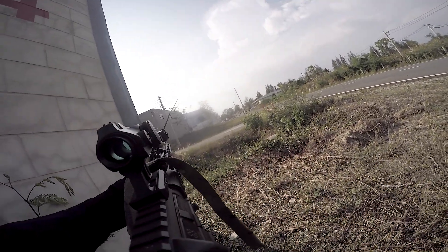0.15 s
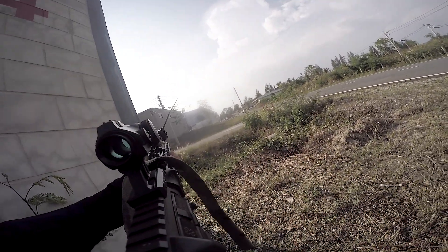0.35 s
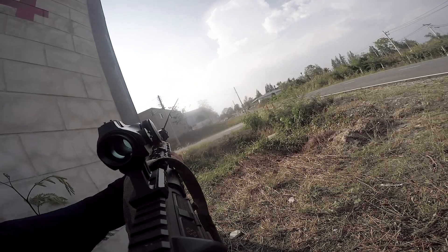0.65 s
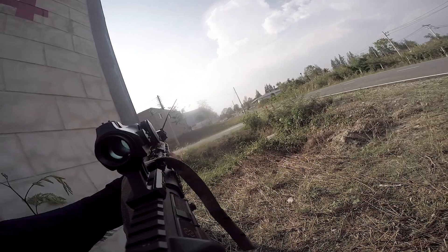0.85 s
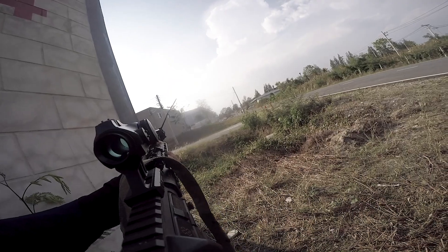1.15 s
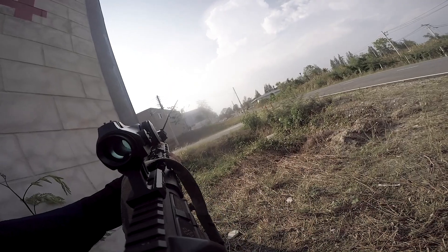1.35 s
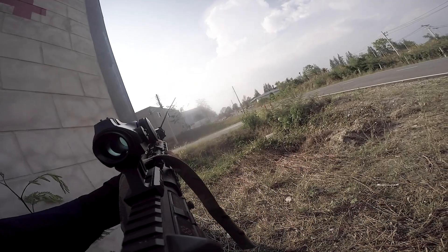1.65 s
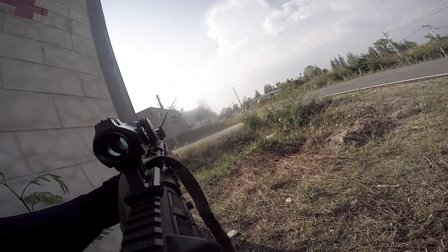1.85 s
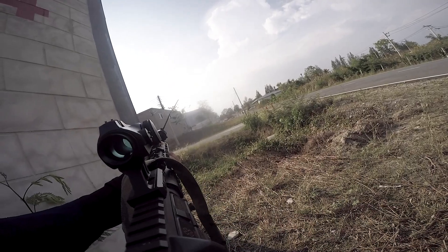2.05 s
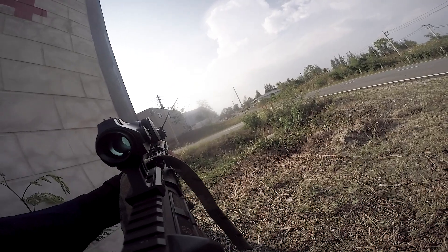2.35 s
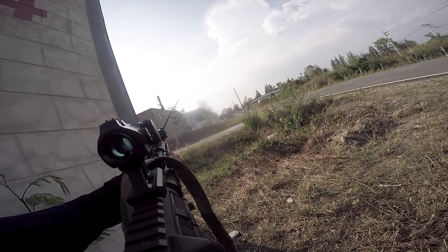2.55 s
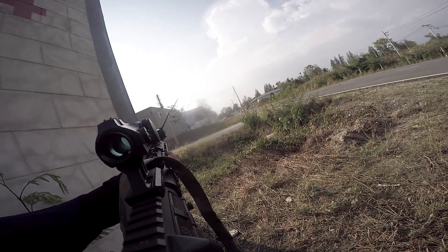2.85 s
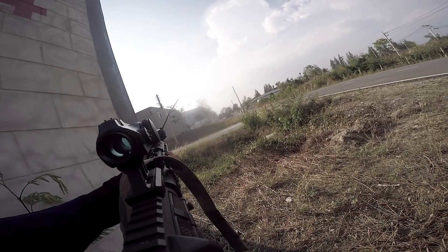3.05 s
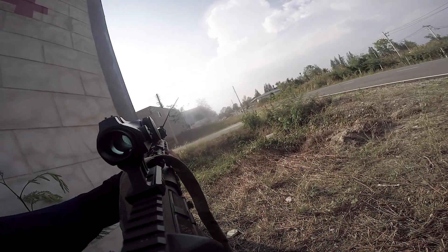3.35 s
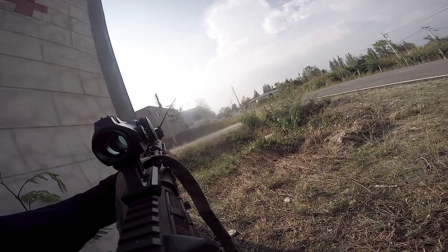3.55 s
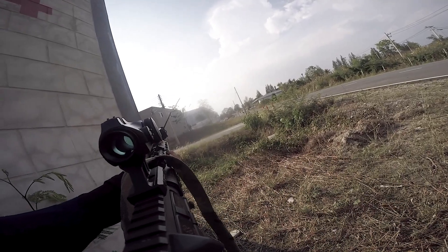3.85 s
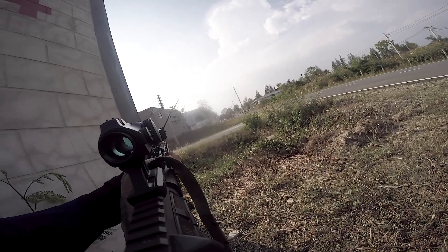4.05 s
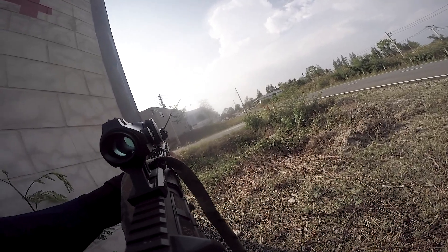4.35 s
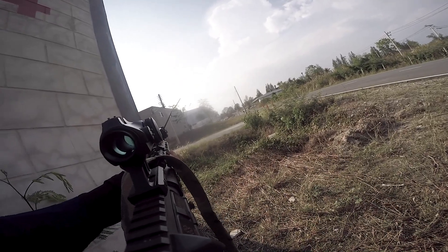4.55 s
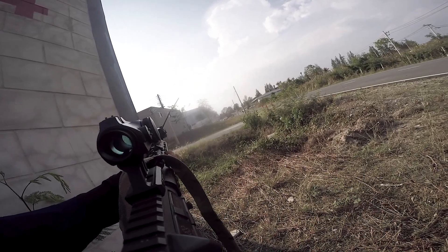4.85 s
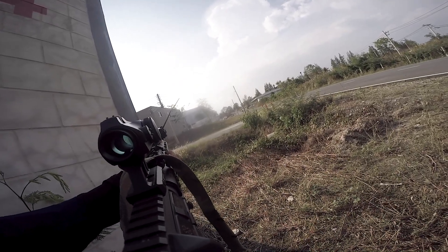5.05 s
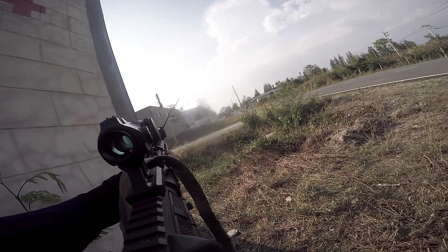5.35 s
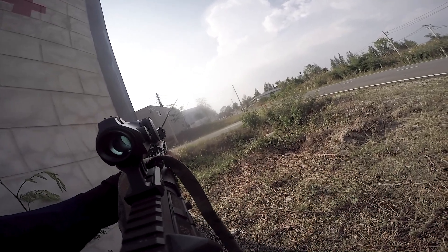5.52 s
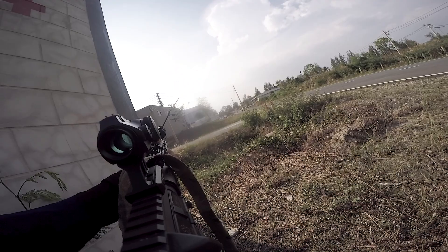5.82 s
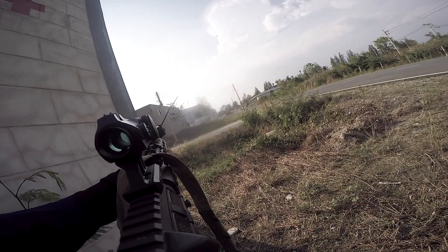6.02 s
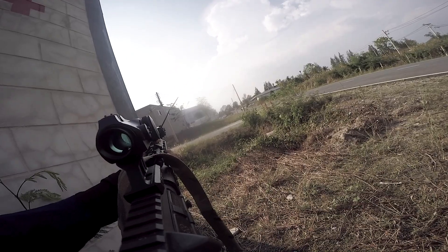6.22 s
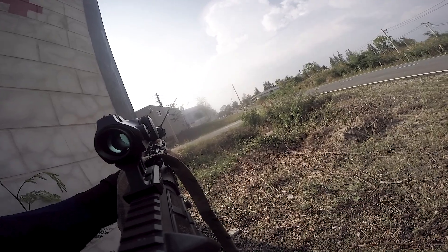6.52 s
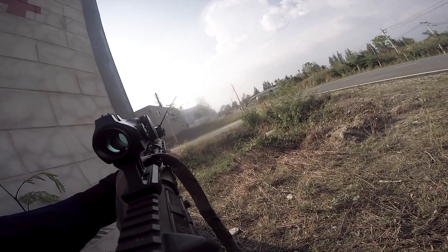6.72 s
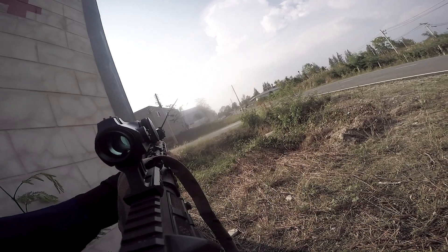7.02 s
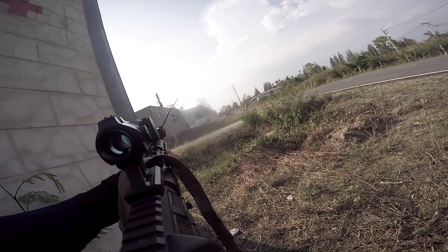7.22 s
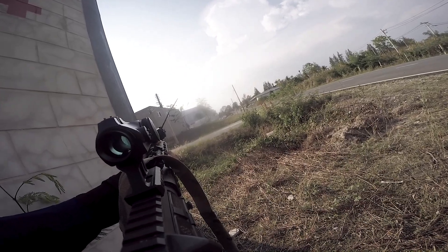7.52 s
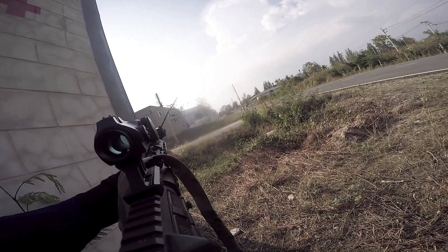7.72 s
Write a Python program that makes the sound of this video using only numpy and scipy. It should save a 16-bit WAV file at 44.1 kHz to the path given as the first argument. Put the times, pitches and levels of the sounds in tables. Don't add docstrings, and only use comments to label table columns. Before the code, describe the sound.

Outdoors beside a block wall, an electric airsoft rifle fires single shots about five a second, very close to a head-worn microphone. Each is a tiny motor whir, gear grind and a double clack ending in a hard piston slam. Strings break into short pauses holding faint trigger ticks and a sling rustle. Soft wind buffets underneath, with only a slight echo off the wall.

```python
import sys
import numpy as np
from scipy import signal
from scipy.fft import rfft, irfft, next_fast_len
from scipy.io import wavfile
from scipy.ndimage import uniform_filter1d, map_coordinates

SR = 44100
rng = np.random.default_rng(int(sys.argv[2]) if len(sys.argv) > 2 else 0)


def master_out(mix):
    frames = np.transpose(np.atleast_2d(mix))
    ceiling = np.clip(frames, -1, 1)
    pcm = np.round(ceiling * 32767).astype(np.int16)
    wavfile.write(sys.argv[1], SR, pcm)


def voltage_ratio(decibels):
    exponent = np.asarray(decibels, float) / 20
    return 10 ** exponent


N = 347508
BEFORE, SPAN, BUSY = 2400, 15000, 6000


def filtered(x, response):
    m = next_fast_len(x.shape[-1] + 8192)
    return irfft(rfft(x, m) * response(np.fft.rfftfreq(m, 1 / SR)), m)[..., :x.shape[-1]]


def resonant(x, modes):
    def response(f):
        return sum(voltage_ratio(db) * 1j * f * width / (hz * hz - f * f + 1j * f * width) for hz, width, db in modes)
    return filtered(x, response)


def crest(x):
    return x / np.sqrt(2 * uniform_filter1d(np.mean(x ** 2, 0), size=66).max())


def wobble(rate, shape):
    knots = rng.standard_normal((shape[0], int(shape[1] * rate / SR) + 4))
    place = np.arange(shape[1]) * rate / SR
    return np.array([map_coordinates(row, [place]) for row in knots])


def rush(spectrum):
    hz, db = np.transpose(spectrum)
    x = filtered(rng.standard_normal(N), lambda f: voltage_ratio(np.interp(np.log(f + 1), np.log(hz + 1), db)))
    return x / x.std()


# t/s, level/dB
GUSTS = [(0, -44.5), (.2, -48), (.6, -57), (1.4, -54), (2.4, -50.5), (3.1, -57), (4.3, -55.5), (6.3, -58),
         (7.1, -60), (7.4, -53.5), (7.88, -56)]
# f/Hz, level/dB per Hz
BUFFET = [(8.8, -31), (15, 0.5), (38, 0.5), (77, -9), (114, -17), (252, -32.5), (300, -31.5), (390, -62.5),
          (660, -120)]
# f/Hz, level/dB per Hz
FIELD = [(88, -32), (150, -5.5), (504, -15.5), (616, -14), (761, -11), (887, -13), (2500, -37.5),
         (3250, -71.5), (5500, -120)]
# f/Hz, level/dB per Hz
LEAVES = [(880, -36.5), (1500, -6), (2220, -6), (2380, -4), (5780, -8), (6250, -6), (6640, -12.5),
          (12000, -16.5), (15600, -42), (22000, -120)]
CALM_DB, FIELD_DB, FIELD_GROWS, LEAVES_DB = -54, -68.5, 0.5, -80


def wind():
    strength_db = np.interp(np.arange(N) / SR, *np.transpose(GUSTS))
    gust, lump = wobble(5.1, (1, N))[0], wobble(21, (1, N))[0]
    buffet = voltage_ratio(strength_db + 2 * gust + 2.9 * lump) * rush(BUFFET)
    field_db = FIELD_DB + FIELD_GROWS * (strength_db - CALM_DB)
    field = voltage_ratio(field_db + 1.6 * gust) * rush(FIELD)
    leaves = voltage_ratio(LEAVES_DB + 0.52 * gust) * rush(LEAVES)
    return buffet + field + leaves


def wall(x):
    t = np.arange(SR // 4) / SR
    decay = rng.standard_normal(len(t)) * voltage_ratio(-60 * t / 0.25)
    tail = filtered(decay, lambda f: f / (f + 400) / (1 + f / 6000))
    return signal.fftconvolve(np.pad(x, (300, 0)), tail / np.linalg.norm(tail))[:N]


# from t/s, to t/s, from f/Hz, to f/Hz, level/dB
SPRING = [
    (3.7, 3.83, 830, 810, -64),
    (3.66, 3.8, 1140, 1040, -70),
]


def spring():
    t, out = np.arange(N) / SR, 0
    for start, stop, from_hz, to_hz, db in SPRING:
        u = np.clip((t - start) / (stop - start), 0, 1)
        phase = 2 * np.pi * np.cumsum(from_hz + (to_hz - from_hz) * u) / SR
        out = out + voltage_ratio(db) * np.sin(np.pi * u) * np.sin(phase)
    return out


# f/Hz, width/Hz, level/dB
CLOTH = [(4900, 300, 2.5), (5500, 600, -3), (7100, 900, -15.5)]
DRAG_S, DRAG_RISE_S, DRAG_HOLD_S, DRAG_DB, DRAG_FALL_DB_PER_S = 1.77, .03, 0.11, -72, 78


def rustle():
    u = np.arange(N) / SR - DRAG_S
    fall = voltage_ratio(-DRAG_FALL_DB_PER_S * np.clip(u - DRAG_RISE_S - DRAG_HOLD_S, 0, N))
    stroke = np.clip(u / DRAG_RISE_S, 0, 1) * fall
    level = stroke * voltage_ratio(DRAG_DB + 3 * wobble(150, (1, N))[0])
    scrape = resonant(resonant(rng.standard_normal(N), CLOTH), [(5300, 3000, 0)])
    return level * scrape / scrape.std()


# t/s, level/dB, knock level/dB, t60/s
TICKS = [
    (1.7729, -40, -14.5, 0.0495),
    (1.9639, -67, -8, 0.04),
    (2.2764, -64, -14, 0.04),
    (2.8294, -46, -16, 0.04),
    (3.8821, -60.5, -11.5, 0.0421),
    (4.2213, -64, 2, 0.04),
    (4.2887, -48, -5, 0.053),
    (7.6294, -71.5, -23.5, 0.058),
    (7.7184, -66, -10.5, 0.04),
]
# f/Hz, width/Hz, level/dB
TRIGGER = [(3000, 740, -2), (4800, 670, 9.5), (5600, 480, 0.5), (6950, 330, -7), (8600, 970, -21.5)]
# f/Hz, width/Hz, level/dB
GRIP = [(717, 140, -4), (1094, 240, -11.5)]


def trigger():
    bright, dull, t = np.zeros(N + SR), np.zeros(N + SR), np.arange(SR // 8) / SR
    for s, db, knock_db, t60 in TICKS:
        burst = voltage_ratio(-60 * t / np.clip(t60, .005, .2)) * rng.standard_normal(len(t))
        bright[round(s * SR):][:len(t)] += voltage_ratio(db - 5) * burst
        dull[round(s * SR):][:len(t)] += voltage_ratio(db + knock_db + 23.0) * burst
    return (resonant(bright, TRIGGER) + resonant(dull, GRIP))[:N]


# f/Hz, level/dB, t60/s
BARREL = [(820, -66, .35), (1090, -66, .3), (1830, -64, .9), (2350, -72, .5)]


def barrel(clock):
    u = np.clip(clock - .041, 0, 1)
    fade = np.sin(np.linspace(np.pi / 2, np.pi, SPAN))
    ring = 0
    for hz, db, t60 in BARREL:
        strength_db = db + 3.3 * rng.standard_normal((len(u), 1))
        ring = ring + voltage_ratio(strength_db - 60 * u / t60) * np.sin(2 * np.pi * hz * u)
    return fade * ring


# from t/s, to t/s, crest t/s (all from pick-up), f/Hz
RECOIL = (.0265, .0475, .0357, 112)
SWAY_HZ, SWAY_DB, SWAY_T60 = 92, -25, 0.079


def recoil(clock, db, sag):
    start, stop, top, hz = RECOIL
    window = np.sin(np.pi * np.clip((clock - start) / (stop - start), 0, 1)) ** 1.5
    pace = hz * (1 + 0.17 * rng.standard_normal((len(clock), 1)))
    phase = 2 * np.pi * pace * (clock - top)
    rocking = np.cos(phase) + 0.17 * np.cos(2 * phase) + sag
    after = np.clip(clock - stop, 0, 1)
    sway = voltage_ratio(SWAY_DB - 60 * after / SWAY_T60) * np.sin(2 * np.pi * SWAY_HZ * after)
    return voltage_ratio(db) * window * rocking + sway


START_S, SPIN_UP_S, SPIN_SHAPE, FULL_HZ = -.055, .025, 1.3, 1125
BRAKE_S, BITE_S, KEEPS, COAST_S = .046, .003, .74, .13


def tooth_rate(clock):
    run, after = np.clip(clock - START_S, 1e-4, 1), np.clip(clock - BRAKE_S, 0, 1)
    braked = (KEEPS + (1 - KEEPS) * np.exp(-after / BITE_S)) * np.exp(-after / COAST_S)
    return FULL_HZ * (1 - np.exp(-(run / SPIN_UP_S) ** SPIN_SHAPE)) * braked


MESH_HZ, MESH_POWER, MESH_DB = 780, 1.7, -4.5
JOLT_DB, JOLT_S, FREE_DB, FREE_DB_PER_S = 6.5, 0.005, -15, 289
SETTLE_S, SETTLE_DB, SETTLE_WIDE_S = 0.12, 6, 0.032


def mesh_db(clock, rate):
    loaded = MESH_DB + 20 * MESH_POWER * np.log10(np.clip(rate / MESH_HZ, .01, 1))
    loaded = loaded + JOLT_DB * np.exp(-(clock / JOLT_S) ** 2)
    settling = SETTLE_DB * np.exp(-((clock - SETTLE_S) / SETTLE_WIDE_S) ** 2)
    return np.where(clock < BRAKE_S, loaded, FREE_DB - FREE_DB_PER_S * (clock - BRAKE_S) + settling)


# t/s from pick-up, whine level/dB
EFFORT = [
    (-.05, -17.5),
    (-.044, -19.5),
    (-.03, 9.5),
    (-.0245, -13.5),
    (-.021, 5),
    (0, -11),
    (0.043, -8),
    (0.052, -15.5),
    (.077, -21.5),
]
STALL_DB_PER_S = 3999.5
# multiple of tooth rate, level/dB
TEETH = [(2, -10), (3, -10), (4, -4), (6, -13.5)]
# f/Hz, width/Hz, level/dB under grind, level/dB under pick-up, level/dB under slam
RECEIVER = [(174.4, 90, -26, 3.5, -5), (330, 130, -18.5, -3.5, -7.5), (523, 92.96, -10.5, -9, -11.5),
            (742, 101, 15, 9.5, 8), (940, 150, 2.5, 0, -1), (1424, 330, -20, -17.5, -7),
            (1892, 314, -15, -0.5, -4), (2040, 97, -20, -5.5, -16), (2691, 265.5, 1.5, -22, 1.5),
            (3765, 226, -3.5, 7.5, 6.5), (4337, 150, 3.5, 5.5, -10), (4662, 170, 7.5, -6, -12),
            (4900, 140, -11.5, -17.5, -22), (6400, 420, -16, -13.5, -19.5), (7000, 1200, -24.5, -14, -31),
            (8650, 130, -34.5, -28.5, -32), (12100, 2400, -23.5, -27.5, -27),
            (13500, 1500, -30.5, -27.5, -31.5)]
# f/Hz, width/Hz, level/dB
COAST = [(740, 250, -4.5), (1180, 220, 1), (1550, 300, 1), (2100, 190, -4.5), (2700, 140, 10),
         (3790, 150, 7), (4880, 350, 5), (6450, 800, -17), (8520, 1500, -15.5), (11800, 1800, -14.5)]


def motor(clock, jitter, gate, grind_db, knock_db, sing_db):
    s, whine = np.transpose(EFFORT)
    on = clock > s[0] - .001
    loaded = clock < BRAKE_S
    rate = tooth_rate(clock) * (1 + jitter * np.where(loaded, 1, 4.5) * wobble(150, clock.shape))
    phase = 2 * np.pi * (np.cumsum(rate, 1) / SR + rng.random((len(clock), 1)))

    load_db = np.interp(clock, s, whine) - STALL_DB_PER_S * np.clip(clock - s[-1], 0, .01)
    load = voltage_ratio(load_db + np.where(clock < -.02, 1, 4) * wobble(200, clock.shape)) * on
    overtones = 0
    for k, db in TEETH:
        level = voltage_ratio(db + 1.9 * wobble(120, clock.shape))
        shake = .9 * np.clip(1 - rate / FULL_HZ, 0, 1) * wobble(900, clock.shape)
        overtones = overtones + level * np.sin(k * (phase + shake))
    overtones = load * overtones

    starting = np.interp(clock, [-.0515, -.051, -.04, -.034], [0, 1, 1, 0])
    knocks = starting * np.exp(8 * np.cos(2 * phase))
    low = crest(resonant(load * np.sin(phase) + overtones, GRIP))
    low += voltage_ratio(knock_db) * crest(resonant(resonant(knocks, GRIP[:1]), [(680, 740, 0)]))
    singing = voltage_ratio(sing_db) * overtones * (rate / 1100) ** 5

    lumps = voltage_ratio(mesh_db(clock, rate) + 2.0 * wobble(250, clock.shape)) * on
    noise = lumps * (1 + gate * np.cos(phase)) * rng.standard_normal(clock.shape)
    grinding = resonant(noise * loaded, [(f, w, db) for f, w, db, _, _ in RECEIVER])
    grinding = grinding + resonant(noise * ~loaded, COAST)
    return low + singing + voltage_ratio(grind_db) * crest(grinding)


def blows(clock, table, modes, scatter_db, firm, yields):
    force, clock = 0, clock[:, :BUSY]
    for s, db, rise, t60, tilt_db in table:
        u = clock - s
        shape = voltage_ratio(np.where(u < 0, 9 * u / rise, -60 * u / t60))
        push = firm * voltage_ratio(yields * db) * np.exp(-(u / .00008) ** 2)
        burst = shape * rng.standard_normal(clock.shape) - push
        size = voltage_ratio(db + scatter_db * rng.standard_normal((len(clock), 1)))
        force = force + size * filtered(burst, lambda f: voltage_ratio(tilt_db * np.log2(np.clip(f, 600, 9000) / 1000)))
    soft = filtered(force, lambda f: 1 / (1 + 1j * f / 6000) ** 2)
    return np.pad(crest(resonant(soft, modes)), ((0, 0), (0, SPAN - BUSY)))


# piston pick-up t/s, level/dB, release t/s after pick-up
SHOTS = [(0.27, -13, .0307), (0.4716, -16.5, .0308), (0.6813, -16, .0302), (0.8829, -17, .0298),
         (1.061, -16.5, .031), (1.261, -16.5, .0308), (1.5133, -15.5, .0304), (2.1401, -14, .031),
         (2.4879, -14, .0309), (2.6972, -16.5, .0311), (2.8906, -16, .0313), (3.213, -15, .0311),
         (3.399, -16, .0305), (3.5683, -16.5, .0307), (3.9465, -14.5, .0311), (4.382, -14.5, .0313),
         (4.6176, -16, .03), (4.817, -16, .031), (5.0196, -17, .0306), (5.261, -16, .031),
         (5.4785, -15, .0305), (5.7051, -15, .0306), (5.8901, -16, .0309), (6.076, -16.5, .0313),
         (6.4139, -15, .0308), (6.671, -15.5, .0313), (6.945, -15.5, .0316), (7.4941, -14, .028)]


def cycle_clock():
    t = (np.arange(SPAN) - BEFORE) / SR
    return np.array([np.interp(t, [-1, 0, lag, 1 + lag], [-1.012, 0, .031, 1.031]) for _, _, lag in SHOTS])


# t/s from pick-up, level/dB, rise/s, t60/s, brightness/dB per octave
CONTACTS = [
    (-.0502, -34, 0.00027, .008, 7.5),
    (-.0252, -19.5, 0.002, 0.02, 7),
    (-.0125, -6, 0.0004, 0.0073, -2),
    (-.0048, -15, .0004, .006, 2),
    (0, 2.5, .0002, 0.0065, -0.5),
    (.0035, -7.5, .0004, .008, -3),
]
# t/s from pick-up, level/dB, rise/s, t60/s, brightness/dB per octave
STROKE = [
    (.0265, -16.5, .0006, 0.012, -3),
    (.0303, -3.5, .0005, .005, -11),
    (.0335, -4.5, .0005, 0.012, -7),
    (.0375, -11, 0.0013, .01, 0.5),
    (.0405, 3.5, 0.00078, 0.0064, -1.1),
    (.0422, 0, .0004, 0.0064, 1),
    (.0442, -5, 0.00061, .008, -6.5),
]
PICK_DB, PICK_GROWS, SLAM_DB, SLAM_GROWS = 4, 1.6, 4, 1.6


def rifle():
    clock, out = cycle_clock(), np.zeros(N + SPAN)
    whine_db = np.array(SHOTS)[:, 1:2]
    usual_db = whine_db.mean()
    swing_db = whine_db - usual_db
    pick_db = usual_db + PICK_DB + PICK_GROWS * swing_db
    slam_db = usual_db + SLAM_DB + SLAM_GROWS * swing_db
    pick_modes = [(f, w, db) for f, w, _, db, _ in RECEIVER]
    slam_modes = [(f, w, db) for f, w, _, _, db in RECEIVER]
    shots = voltage_ratio(whine_db) * motor(clock, jitter=.015, gate=0.49, grind_db=-10.0, knock_db=-13.5, sing_db=-20.0)
    shots += voltage_ratio(pick_db) * blows(clock, CONTACTS, pick_modes, scatter_db=1.93, firm=5, yields=.5)
    stroke = blows(clock, STROKE, slam_modes, scatter_db=2.5, firm=3.2, yields=0.15)
    shots += voltage_ratio(slam_db) * (stroke + recoil(clock, db=-10.0, sag=0.25)) + barrel(clock)
    for row, shot in zip(SHOTS, shots):
        out[round(row[0] * SR) - BEFORE:][:SPAN] += shot
    return out[:N]


def scene():
    close = rifle() + trigger() + spring() + rustle()
    return (close + voltage_ratio(-31.5) * wall(close) + wind())[None]


def roll_off(x):
    return signal.sosfilt(signal.butter(12, 16440, fs=SR, output="sos"), x)


MIC_HZ, MIC_DB, TOP_HZ = 9000, -6.5, 15700


def record(dry):
    soft = dry / (1 + np.abs(dry / .29) ** 6) ** (1 / 6)

    def housing(f):
        dulling_db = MIC_DB * np.log2(np.clip(f / MIC_HZ, 1, 2))
        return voltage_ratio(dulling_db - np.clip(f - TOP_HZ + 500, 0, 2000) / 18)

    mix = filtered(soft, housing)
    return roll_off(mix)


dry = scene()
out = record(dry)
master_out(out)
```